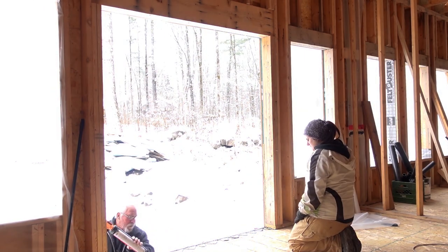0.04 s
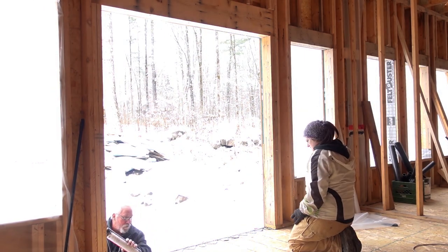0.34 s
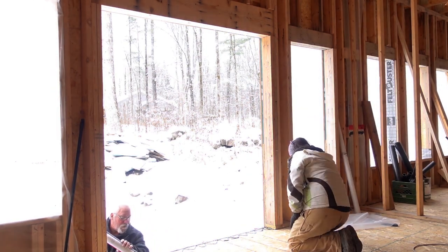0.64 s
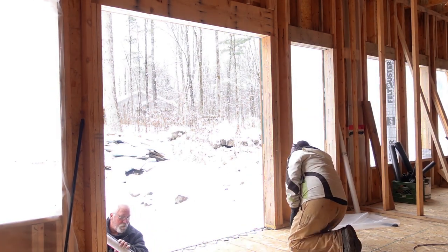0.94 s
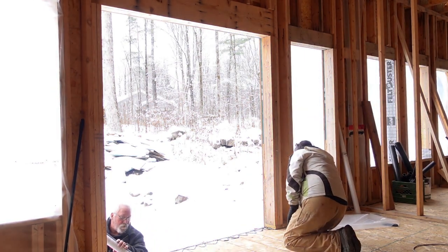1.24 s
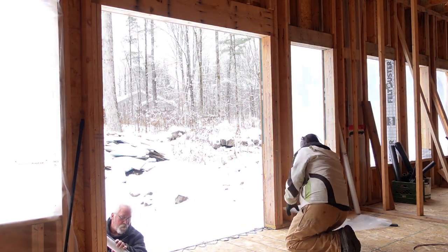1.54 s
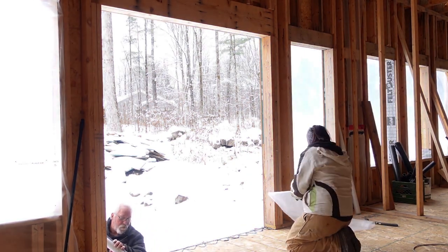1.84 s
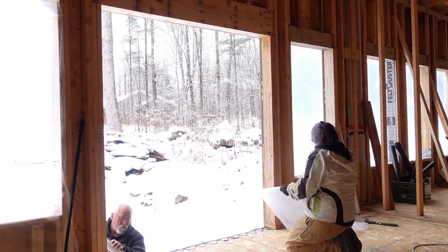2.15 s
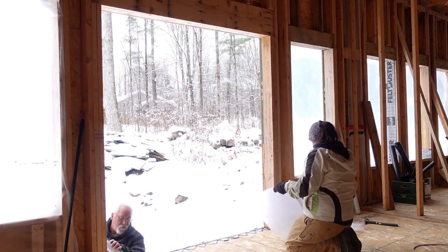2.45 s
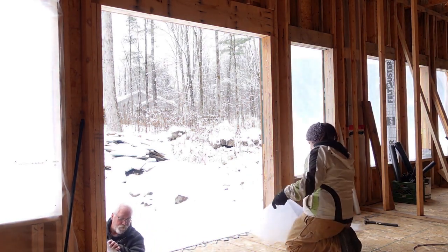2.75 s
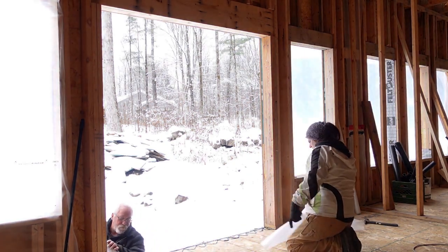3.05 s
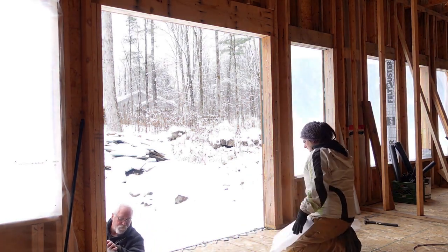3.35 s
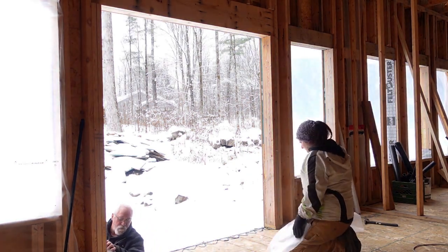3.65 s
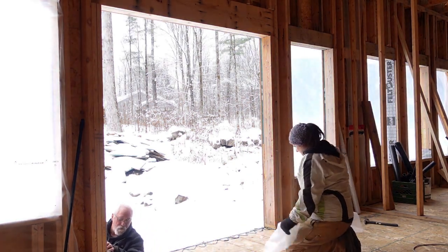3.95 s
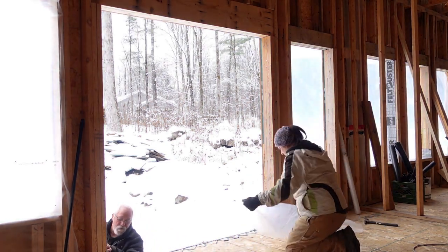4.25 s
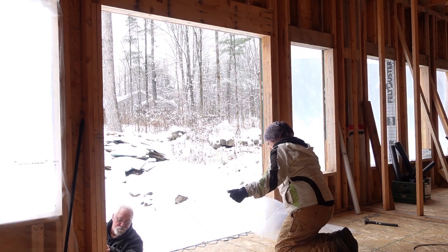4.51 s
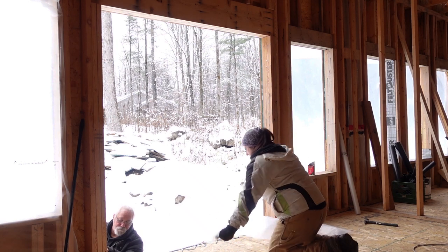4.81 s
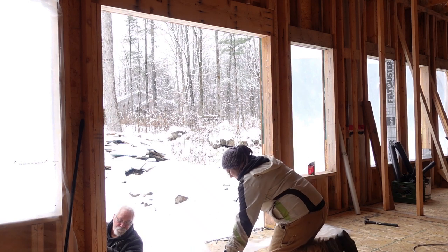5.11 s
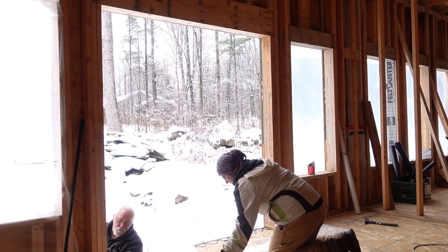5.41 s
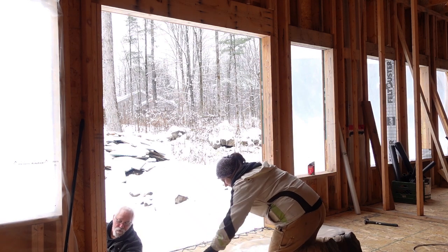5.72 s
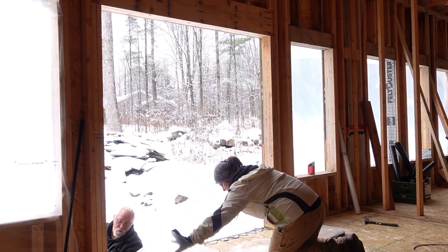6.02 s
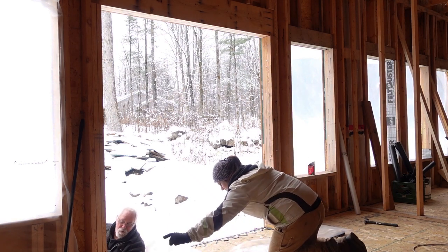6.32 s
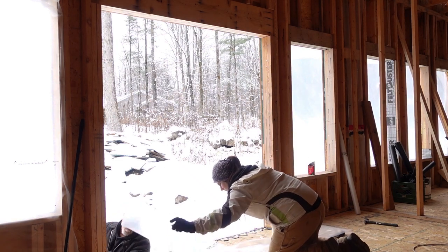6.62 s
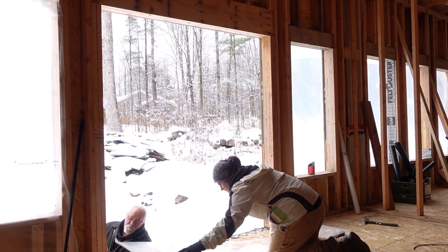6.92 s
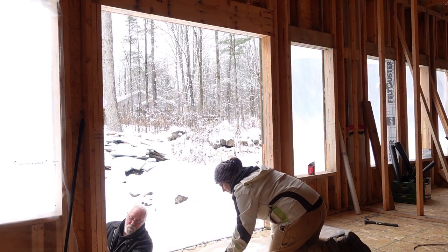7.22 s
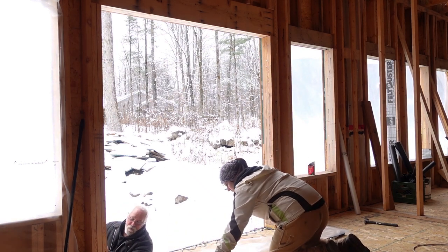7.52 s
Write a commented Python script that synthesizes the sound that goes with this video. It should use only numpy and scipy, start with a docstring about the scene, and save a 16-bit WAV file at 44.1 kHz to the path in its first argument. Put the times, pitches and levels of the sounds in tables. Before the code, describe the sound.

A plastic sheet crinkles, flaps and snaps as it is spread out, with dull knee bumps on plywood and a small clink.

```python
"""Plastic sheet on a plywood floor

Someone kneeling in an unfinished house picks up a plastic sheet and spreads it out. Many tiny buckles
make it flap, crinkle and swish; its edge scuffs the floor and large creases snap through. Knees and
boots bump the plywood, a panel booms under a hand, and a small hard object clinks and bounces.
The bare timber room echoes, over still air."""
import sys
import numpy as np
from scipy import signal
from scipy.fft import rfft, irfft, next_fast_len
from scipy.io import wavfile

SR = 44100
rng = np.random.default_rng(int(sys.argv[2]) if len(sys.argv) > 2 else 0)


def unload_audio(sound):
    """Save the sound as a 16-bit wav file, at the path given as the first command line argument."""
    columns = np.transpose(np.atleast_2d(sound))
    # keep every value between -1 and 1, then stretch to whole-number steps
    steps = np.round(np.clip(columns, -1, 1) * 32767)
    wavfile.write(sys.argv[1], SR, steps.astype(np.int16))


N = 338058
TIME_S = np.arange(N) / SR
SLIDE_ATTACK_S, SLIDE_RELEASE_S = 0.024, 0.0083

# Spectral shapes of the sources and the echo: freq_hz, gain_db
AIR_EQ = [(30, -35), (100, -7.5), (200, -1), (285, 10.5), (380, 4.5), (800, 4), (2000, -35), (5000, -27.5),
          (10000, -16), (16000, -18)]
FLAP_EQ = [(40, -76), (90, -40), (150, -2), (280, -6), (520, -0.5), (750, -1.5), (1200, -7), (3000, -50)]
CRINKLE_EQ = [(200, -52), (500, -6), (900, 2), (1600, 0.5), (2500, -4.5), (3500, -12.5), (6000, -13),
              (16000, -55)]
SWISH_EQ = [(1200, 4.5), (2300, 1.5), (3300, 0), (4500, -1.5), (6000, -10), (8000, -17), (16000, -22)]
FIZZ_EQ = [(4000, -4), (6500, 0.5), (8000, -3), (10000, -8), (13000, -10), (16000, -16)]
THUD_EQ = [(25, -41), (50, -36), (75, -10.5), (125, 3), (200, -14), (290, 5.5), (420, -27), (900, -48),
           (3000, -60)]
SNAP_EQ = [(250, -4), (500, 6.5), (750, -4.5), (1000, 2.5), (1350, -.5), (1800, 1), (2400, -0.5),
           (3300, 2.5), (5000, -2), (8000, -2), (16000, -8.5)]
ROOM_EQ = [(25, -32), (70, -0.5), (250, 7.5), (600, -3.5), (1200, -1.5), (3000, 2), (8000, 1.5),
           (16000, 5.5)]
# Steady handling of the sheet: time_s, bend_db, swish_db, fizz_db
STEADY_HANDLING = [(1.25, -53, -59.5, -66.5), (1.43, -40, -40.5, -49), (1.62, -36.5, -37, -48),
                   (1.85, -38, -42.5, -42.5), (2.01, -41, -42.5, -49.5), (2.24, -39.5, -39.5, -50.5),
                   (2.52, -42.5, -41, -53), (2.8, -45.5, -49, -55.5), (3.05, -40, -47.5, -60.5),
                   (3.58, -39.5, -43.5, -56), (3.82, -40.5, -43, -56), (4.62, -35, -43, -54.5),
                   (4.96, -43.5, -44.5, -53.5), (5.45, -41, -46.5, -53), (6.15, -40.5, -61, -55.5),
                   (6.82, -37, -41, -49.5), (6.98, -42, -47.5, -56), (7.66, -43, -44, -52)]
# Tugs that crumple it: start_s, length_s, crinkle_db, flap_re_crinkle_db
SHEET_TUGS = [(0.891, 0.074, -52, 0.5), (1.34, 0.11, -40, -2), (1.458, .035, -34.5, -1.5),
              (1.517, 0.035, -33, -28), (2.112, 0.084, -43.5, 3), (2.8, .18, -55.5, 13),
              (3.07, 0.095, -34, -3.5), (3.159, 0.052, -32, 1), (3.307, 0.061, -29.5, -22),
              (3.44, 0.081, -31, -6.5), (4.004, 0.036, -33.5, -1), (4.276, .07, -31, -1),
              (4.48, 0.051, -36, 2), (5.099, 0.16, -39, 5.5), (5.274, 0.17, -34.5, 2),
              (5.55, 0.05, -38, 0.5), (5.736, 0.16, -36, 2.5), (5.924, 0.11, -35, 1.5),
              (6.226, 0.057, -31.5, 3.5), (6.298, 0.045, -28.5, 3), (6.373, 0.096, -39.5, 7),
              (6.59, 0.14, -32.5, 3.5), (7.18, 0.056, -35.5, -1.5), (7.23, 0.069, -31, -9),
              (7.418, 0.045, -33.5, -3.5), (7.568, 0.042, -32, -18)]
# Film drawn over film: start_s, length_s, swish_db, fizz_re_swish_db
FILM_SLIDES = [(1.46, 0.049, -34.5, -6), (1.518, 0.062, -31.5, -19), (1.79, 0.15, -42, -4.5),
               (2.04, 0.027, -33.5, -21), (2.583, 0.13, -38.5, -15), (3.423, 0.048, -31, -15),
               (4.047, 0.055, -39, -3.5), (4.171, 0.15, -39.5, -3), (4.302, 0.03, -35, -24),
               (4.7, 0.13, -37.5, -10.5), (5.289, 0.028, -31, -5), (5.366, 0.051, -32.5, -12),
               (6.26, 0.044, -43, -10), (7.213, 0.026, -45, -4), (7.41, 0.14, -42, -3)]
# Sheet edge on plywood: start_s, length_s, level_db, pitch_hz
EDGE_SCUFFS = [(0.878, 0.036, -50, 3400), (2.856, .13, -43, 4400)]
# Knees and boots: start_s, level_db, decay_s
FLOOR_BUMPS = [(1.467, -47, 0.018), (1.921, -47, 0.094), (3.171, -44, 0.034), (4.278, -43, 0.05),
               (4.701, -36.5, 0.11), (4.768, -37.5, 0.19), (4.869, -48, 0.081), (5.081, -41, 0.03),
               (5.726, -41, 0.081), (5.93, -44, 0.26), (6.581, -35, 0.093), (6.691, -37, 0.026),
               (7.191, -51, 0.11), (7.508, -43, 0.057)]
# Large creases: start_s, level_db, pitch_hz, width_oct, crack_re_snap_db, crack_hz, room_send_db
CREASE_SNAPS = [(2.1249, -7.5, 1310, 0.79, -6, 3400, 2.5), (2.3337, -7, 1050, 0.47, -9, 3150, -1),
                (3.0772, -3.5, 1340, 0.23, -1.5, 2880, -0.5), (3.1644, -2, 970, 0.49, -13, 2550, -0.5),
                (3.1865, -1, 1020, .45, -22, 2600, -7), (3.2879, -0.5, 970, 0.38, -18, 3000, -21),
                (3.3006, 0, 630, 0.37, -2.5, 5000, -0.5), (3.8534, -2.5, 1790, 0.36, -2, 4030, 1),
                (3.887, -2.5, 1340, .4, 2.5, 3600, 0), (4.0189, -3.5, 1020, 0.52, -20, 2600, 2.5),
                (4.0446, -3, 1140, 0.55, -10, 3450, 1), (4.1341, -3, 1700, 0.4, -10, 2810, 3),
                (4.2841, 0.5, 1660, 0.47, -1.5, 4260, 0.5), (4.3143, -3.5, 1020, .7, -7, 3400, -2),
                (4.472, -7.5, 1440, 0.53, -16, 3380, -4), (4.4802, 2, 1350, 0.45, -43, 2840, 5.5),
                (4.5128, 0, 1450, .55, -6, 3200, -22), (5.0794, -10, 910, 0.48, -26, 3260, 5.5),
                (5.135, -11, 750, 0.65, -10.5, 3436, 8.5), (5.5906, -7.5, 1070, .4, -15, 3000, -7),
                (5.7111, 6.5, 1036, 0.42, -23, 3100, -1), (5.918, 7, 1270, 0.38, -19, 3000, -5),
                (5.9444, 3, 860, 0.54, -3.5, 2950, 0.5), (6.2179, -10.5, 970, 0.6, -6, 4400, -0.5),
                (6.3244, -1.5, 990, 0.76, -10.5, 4140, -18), (6.3914, -2.5, 935, 0.47, -16, 3330, 1.5),
                (6.5722, 5, 1050, 0.38, -9, 3700, -3), (6.7003, 7.5, 1220, 0.34, -10.5, 3230, -3.5),
                (7.174, -7, 574, .6, -12, 3000, -1.5), (7.257, -1.5, 1010, 0.5, -20, 3380, 2),
                (7.4579, -2.5, 1340, 0.35, -19, 2940, -0.5), (7.592, -5, 1250, 0.27, -19, 3100, 3.5)]
# Floor panel resonance: pitch_hz, level_db, t60_s
PANEL_MODE = (155, -34, 1.4)
# Strike and bounce: start_s, level_db
CLINK_HITS = [(6.9932, -2.5), (7.012, -4)]
# Resonances of the hard object: pitch_hz, level_db, t60_s
OBJECT_MODES = [(2850, 15.5, 0.023), (3130, 4, 0.08), (3630, -3, 0.062), (3850, 7, 0.051), (6190, 2, .27),
                (6660, -3.5, 0.19), (7660, -10, .12), (10000, -18, .1)]
# Timber room decay: freq_hz, t60_s
ROOM_DECAY = [(100, 1), (400, 0.25), (1500, 0.46), (4000, 0.54), (8000, 0.42), (16000, 0.56)]
# Stereo width of diffuse sound: freq_hz, side_re_mid_db
SIDE_EQ = [(60, -27), (180, -18), (350, -16.5), (700, -7), (1400, -6.5), (2800, -6.5), (5600, -4.5),
           (10000, -2), (15000, -11)]


def amp(db):
    """Decibels to gain."""
    return 10 ** (np.asarray(db) / 20)


def unit(x):
    """Scale to rms 1."""
    return x / np.sqrt(np.mean(x ** 2) + 1e-20)


def lookup(table, hz):
    """Interpolate on a log-frequency axis."""
    freq_hz, value = np.transpose(table)
    return np.interp(np.log(hz + 1), np.log(freq_hz + 1), value)


def add(mix, start_s, sound):
    """Mix in place at start_s."""
    part = mix[round(start_s * SR):][:len(sound)]
    part += sound[:len(part)]


def colour(x, eq):
    """Filter by a spectral shape."""
    size = next_fast_len(x.shape[-1] + 2048)
    gain = amp(lookup(eq, np.fft.rfftfreq(size, 1 / SR)))
    return irfft(rfft(x, size) * gain, size)[..., :x.shape[-1]]


def diffuse(mid, side):
    """Sound from all around, widest in the treble."""
    side = colour(side, SIDE_EQ)
    return np.array([mid + side, mid - side])


def still_air(level_db=-55):
    """Faint, steady, diffuse noise."""
    noise = colour(rng.standard_normal((2, N)), AIR_EQ)
    return amp(level_db) * unit(diffuse(*noise))


def pop(pitch_hz, width_oct, skirt_db=11, scatter_s=0.001138, soft_hz=14000, resonance_db=5.5):
    """One buckle of the film: a few cycles around pitch_hz, energy 1."""
    size, half = 1024, 513
    hz = np.abs(np.fft.fftfreq(size, 1 / SR))
    offset = np.log2((hz + 20) / pitch_hz) / max(width_oct, 0.15)
    band_db = -skirt_db * (np.hypot(1, offset) - 13.5)
    knots_hz = np.geomspace(200, 16000, size // 32)
    fold_db = resonance_db * np.interp(hz, knots_hz, rng.standard_normal(len(knots_hz)))
    radiation = hz ** 2 / (hz ** 2 + 200 ** 2)  # thin film moves little air in the bass
    gain = radiation * amp(fold_db + band_db) * np.exp(-hz / soft_hz)
    spectrum = np.exp(np.conj(signal.hilbert(np.log(gain + 1e-5))))[:half]  # minimum phase
    # Waves leave from many points of the fold; the shortest scatter most.
    lateness = np.interp(hz[:half], np.linspace(0, SR / 2, size // 16), rng.random(size // 16))
    delay_s = lateness * scatter_s * np.clip(np.sqrt(hz[:half] / pitch_hz), 0.5, 2)
    pulse = irfft(spectrum * np.exp(-2j * np.pi * np.cumsum(delay_s) * SR / size))[:half]
    return pulse / np.linalg.norm(pulse)


def crackle(rate_per_s, spread_db, low_hz, high_hz, width_oct, facets=24):
    """Small buckles of either sign at random times, one pitch per facet."""
    out = np.zeros(N)
    for pitch_hz in np.geomspace(low_hz, high_hz, facets):
        chance = rng.random(N) / (rate_per_s / facets / SR)
        onsets = np.flatnonzero(chance < 1)[:, None]
        signs = 1 - 2 * (onsets % 2)
        sizes = amp(spread_db * np.minimum(-np.log(chance[onsets] + 1e-12), 4))
        pulse = pop(pitch_hz, width_oct)
        samples = onsets + np.arange(len(pulse))
        out += np.bincount(samples.ravel(), (signs * sizes * pulse).ravel(), N)[:N]
    return out


def stroke(start_s, length_s, attack_s, release_s):
    """Envelope of one hand movement: rise, hold, decay."""
    t = TIME_S - start_s
    return np.clip(t / attack_s, 0, 1) * np.exp(-np.clip((t - length_s) / release_s, 0, 30))


def unevenness(step_s=0.034):
    """Random wobble of hand speed, rms 1."""
    knots_s = np.arange(0, N / SR + step_s, step_s)
    return unit(np.interp(TIME_S, knots_s, rng.standard_normal(N)[:len(knots_s)]))


def handling(opens_s=2.75, opening_s=0.11, bunched_db=-6.5, open_db=2.5):
    """Flap, crinkle, swish and fizz gains: steady handling, tugs and slides summed in power."""
    time_s, *levels_db = np.transpose(STEADY_HANDLING)
    bend_db, swish_db, fizz_db = (np.interp(TIME_S, time_s, db) for db in levels_db)
    bend_db -= 0.1 * unevenness()
    # Broad folds move freely once the sheet falls open.
    freedom_db = np.interp(TIME_S, [opens_s, opens_s + opening_s], [bunched_db, open_db])
    flap, crinkle = amp(bend_db + freedom_db) ** 2, amp(bend_db - 0.5) ** 2
    swish, fizz = amp(swish_db + 1.5) ** 2, amp(fizz_db + 1) ** 2
    for start_s, length_s, level_db, flap_re_crinkle_db in SHEET_TUGS:
        power = (amp(level_db) * stroke(start_s, length_s, attack_s=0.0073, release_s=0.021)) ** 2
        crinkle += power
        flap += power * amp(flap_re_crinkle_db) ** 2
    for start_s, length_s, level_db, fizz_re_swish_db in FILM_SLIDES:
        power = (amp(level_db) * stroke(start_s, length_s, SLIDE_ATTACK_S, SLIDE_RELEASE_S)) ** 2
        swish += power
        fizz += power * amp(fizz_re_swish_db) ** 2
    return np.sqrt([flap, crinkle, swish, fizz])


def sheet_rustle():
    """Broad folds flap, small creases crinkle, film on film swishes and fizzes."""
    flap, crinkle, swish, fizz = handling()
    folds = crackle(rate_per_s=1000, spread_db=1.5, low_hz=116, high_hz=2460, width_oct=1.65)
    creases = crackle(rate_per_s=1100, spread_db=3.5, low_hz=816, high_hz=5000, width_oct=2.2)
    slips = crackle(rate_per_s=3500, spread_db=4, low_hz=2010, high_hz=10000, width_oct=1.2)
    fine_slips = crackle(rate_per_s=8100, spread_db=3, low_hz=4870, high_hz=15300, width_oct=0.88)
    return (amp(-0.68) * flap * unit(colour(folds, FLAP_EQ))
            + amp(0.52) * crinkle * unit(colour(creases, CRINKLE_EQ))
            + amp(0.73) * swish * unit(colour(slips, SWISH_EQ))
            + amp(0.35) * fizz * unit(colour(fine_slips, FIZZ_EQ)))


def edge_scuffs(range_oct=0.2):
    """The sheet's edge crosses the plywood in tiny slips: a light, narrow swish."""
    out = np.zeros(N)
    for start_s, length_s, level_db, pitch_hz in EDGE_SCUFFS:
        slips = crackle(rate_per_s=4000, spread_db=-3.5, low_hz=pitch_hz / 2 ** range_oct,
                        high_hz=pitch_hz * 2 ** range_oct, width_oct=0.24, facets=6)
        out += amp(level_db) * stroke(start_s, length_s, SLIDE_ATTACK_S, SLIDE_RELEASE_S) * unit(slips)
    return out


def floor_bumps(rise_s=0.0024):
    """Knees and boots on plywood: dull, decaying noise."""
    out, t = np.zeros(N), TIME_S[:SR]
    rise = 1 - np.exp(-t / rise_s)
    for start_s, level_db, decay_s in FLOOR_BUMPS:
        thud = unit(colour(rng.standard_normal(len(t)), THUD_EQ))
        add(out, start_s, amp(level_db) * thud * rise * np.exp(-t / decay_s))
    return out


def crease_snaps(settle_db=-9, settle_s=0.01, detune_oct=0.57, neighbours=5):
    """A crease snaps through with a crack, then its neighbours settle. Returns direct, room send."""
    direct, send = np.zeros(N), np.zeros(N)
    neighbour_gain = amp(settle_db) / np.sqrt(neighbours)
    for start_s, level_db, pitch_hz, width_oct, crack_db, crack_hz, send_db in CREASE_SNAPS:
        snap = np.zeros(SR // 8)
        body = pop(pitch_hz, width_oct, skirt_db=5.5, scatter_s=0.001583, soft_hz=9050, resonance_db=2)
        crack = pop(crack_hz, width_oct=0.46, skirt_db=5, scatter_s=0.003, soft_hz=10800, resonance_db=2)
        add(snap, 0, body + amp(crack_db) * crack)
        waits_s = 0.001054 + rng.exponential(settle_s, neighbours)
        for wait_s, detune in zip(waits_s, rng.standard_normal(neighbours)):
            neighbour = pop(pitch_hz * 2 ** (detune_oct * detune), width_oct, skirt_db=7.5)
            add(snap, wait_s, rng.choice([-1, 1]) * neighbour_gain * neighbour)
        add(direct, start_s, amp(level_db) * snap)
        add(send, start_s, amp(level_db + send_db) * snap)
    return colour(direct, SNAP_EQ), colour(send, SNAP_EQ)


def panel_boom(start_s=6.59, rise_s=0.015):
    """A hand's weight sets one floor panel booming."""
    pitch_hz, level_db, t60_s = PANEL_MODE
    t = np.maximum(TIME_S - start_s, 0)
    envelope = amp(level_db - 60 * t / t60_s) * (1 - np.exp(-t / rise_s))
    return envelope * np.sin(2 * np.pi * pitch_hz * t)


def clinks(ring_db=-31):
    """A small hard object strikes and bounces. Returns bright ticks, short rings."""
    ticks, rings, t = np.zeros(N), np.zeros(N), TIME_S[:SR // 3]
    for start_s, level_db in CLINK_HITS:
        tick = pop(3370, width_oct=0.46, skirt_db=6.5, scatter_s=0.0017, soft_hz=30000, resonance_db=2)
        add(ticks, start_s, amp(level_db + 1) * tick)
        for pitch_hz, mode_db, t60_s in OBJECT_MODES:
            envelope = amp(level_db + ring_db + mode_db - 60 * t / t60_s)
            add(rings, start_s, envelope * np.sin(2 * np.pi * (pitch_hz * t + rng.random())))
    return ticks, rings


def timber_room(x, early_db=6, early_s=0.014, gap_s=0.0012):
    """Diffuse echo, decaying per band; floor and nearby studs boost its start."""
    frames = dict(fs=SR, nperseg=256, noverlap=192)
    hz, t, source = signal.stft(x, **frames)
    t = t[:len(t) // 10]
    decay = amp(-60 * t / lookup(ROOM_DECAY, hz)[:, None] + early_db * np.exp(-t / early_s)) ** 2
    decay *= np.clip(t / gap_s - 1, 0, 1)
    decay /= decay.sum(1, keepdims=True)
    energy = signal.fftconvolve(abs(source) ** 2, decay, axes=1)[:, :source.shape[1]]
    reflections = signal.stft(rng.standard_normal((2, N)), **frames)[2]
    reflections *= np.sqrt(abs(energy) / np.mean(abs(reflections) ** 2))
    echo = signal.istft(reflections, **frames)[1][:, :N]
    return diffuse(*colour(echo, ROOM_EQ))


def scene():
    """Sheet, floor and clink with their echo, slightly right of centre, over still air."""
    rustle = amp(-3.5) * (sheet_rustle() + edge_scuffs())
    bumps = floor_bumps()
    snaps, snap_send = crease_snaps()
    ticks, rings = clinks()
    direct = rustle + bumps + amp(1) * snaps + panel_boom() + ticks + rings
    send = rustle + amp(-1.5) * bumps + amp(1) * snap_send + amp(2.5) * ticks + amp(-2) * rings
    return direct * amp([[-0.45], [0.45]]) + timber_room(send) * amp([[-0.15], [0.15]]) + still_air()


def record(dry, start_s=0.778, cutoff_hz=15900):
    """Silence until start_s; steep low-pass."""
    gate = np.clip((TIME_S - start_s) * SR / 64, 0, 1)
    lowpass = signal.firwin(511, cutoff_hz, window=("kaiser", 9), fs=SR)
    return signal.oaconvolve(dry * gate, lowpass[None], "same")


dry = scene()
out = record(dry)
unload_audio(out)
```